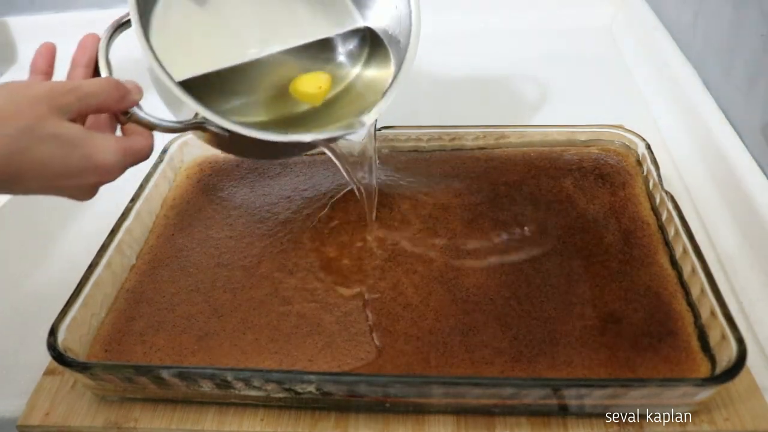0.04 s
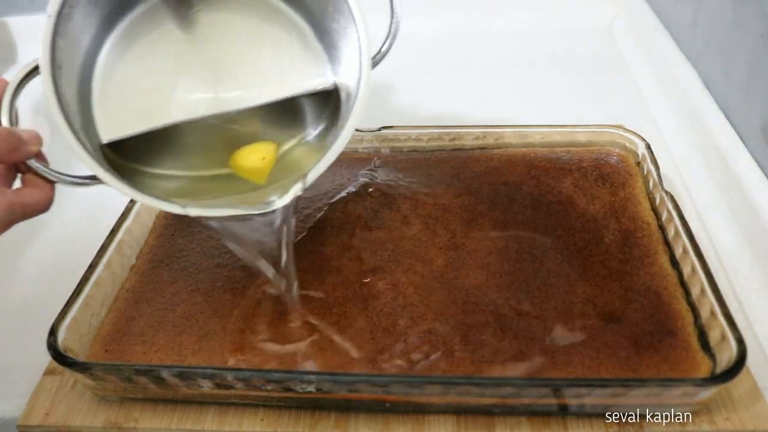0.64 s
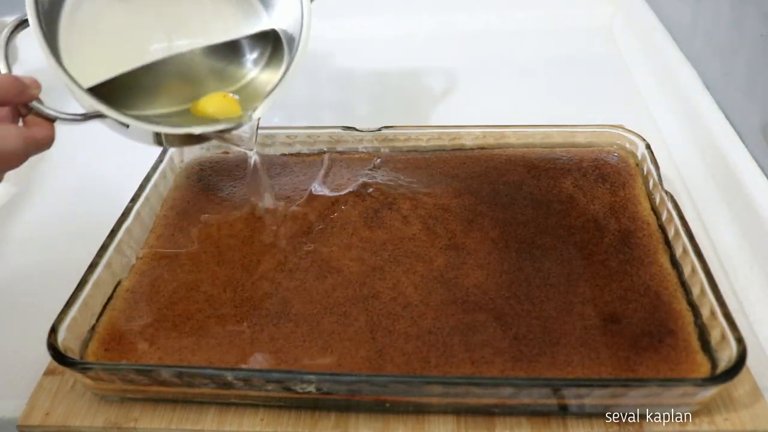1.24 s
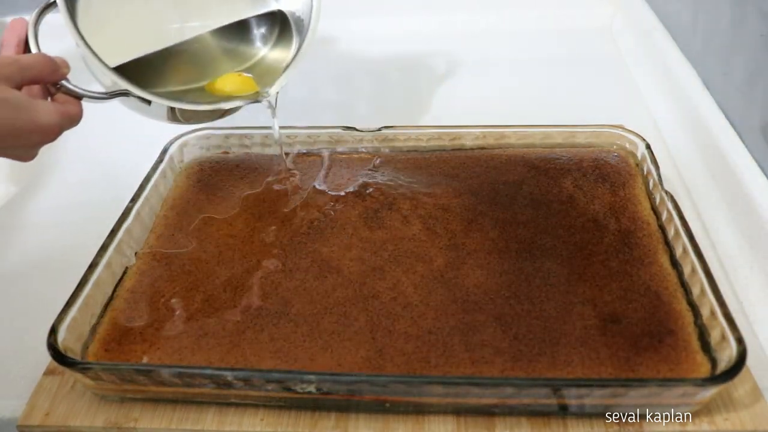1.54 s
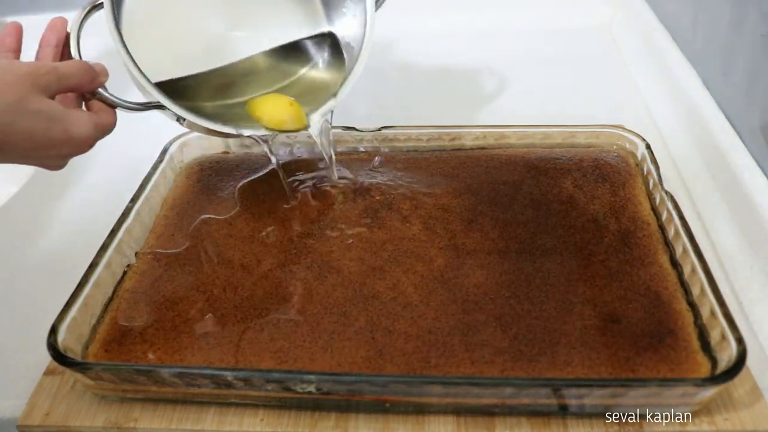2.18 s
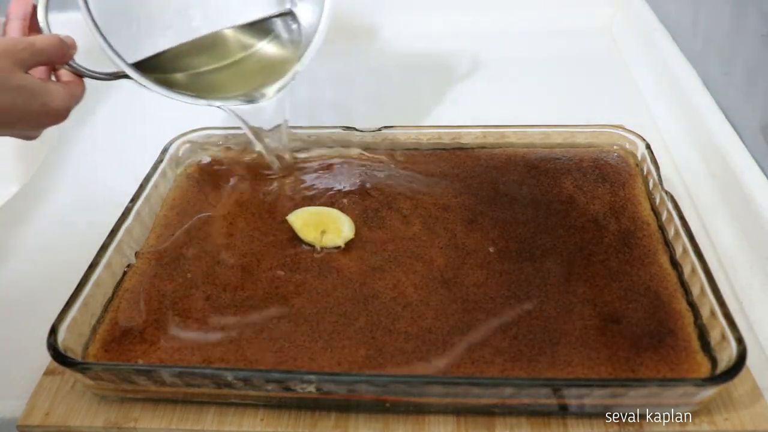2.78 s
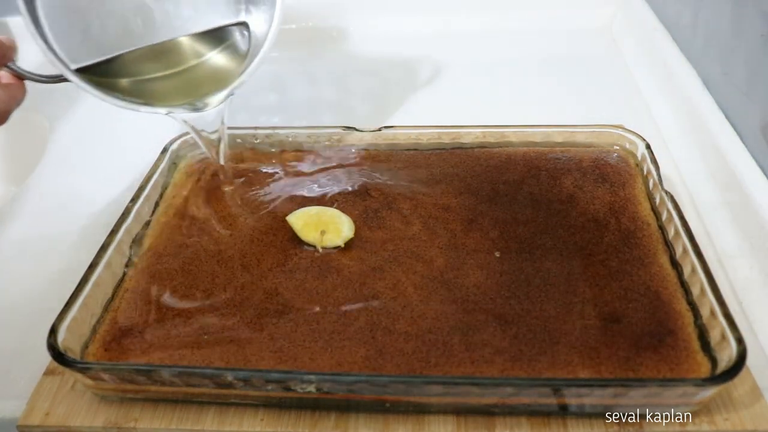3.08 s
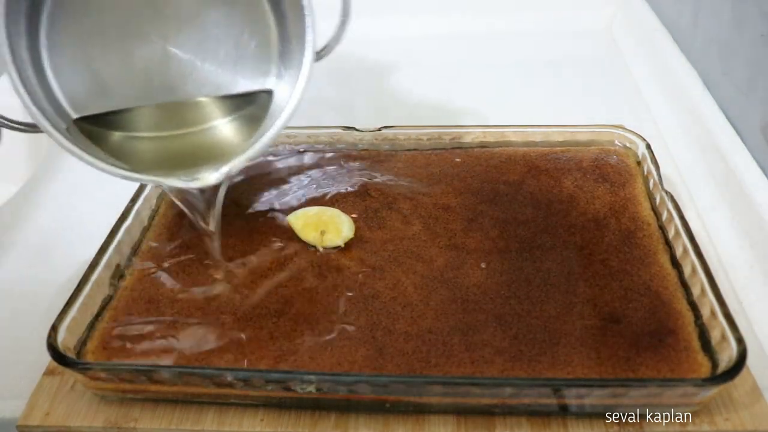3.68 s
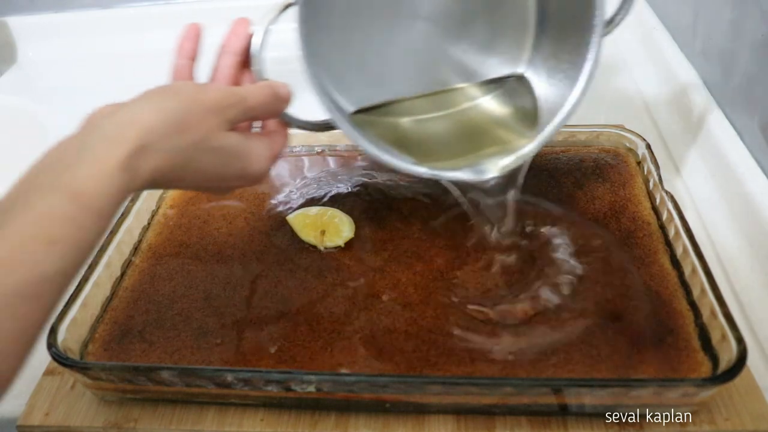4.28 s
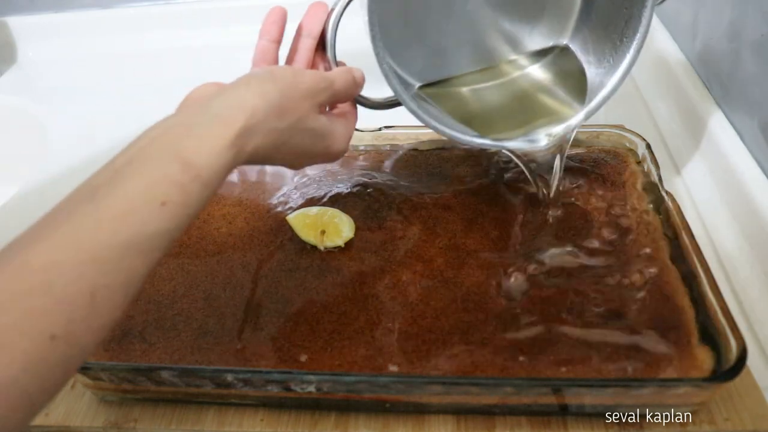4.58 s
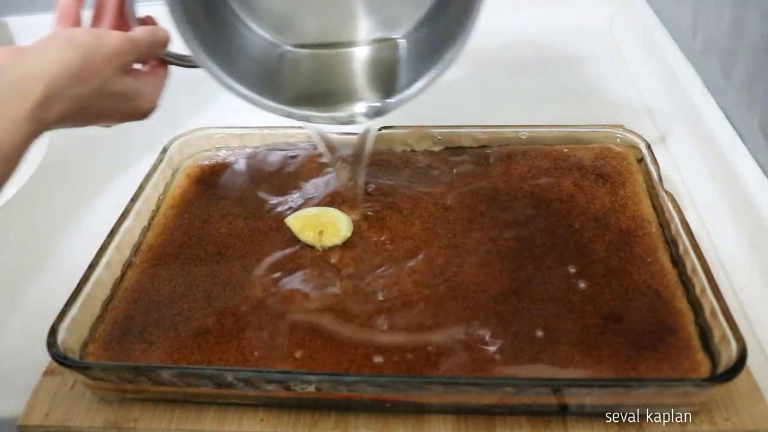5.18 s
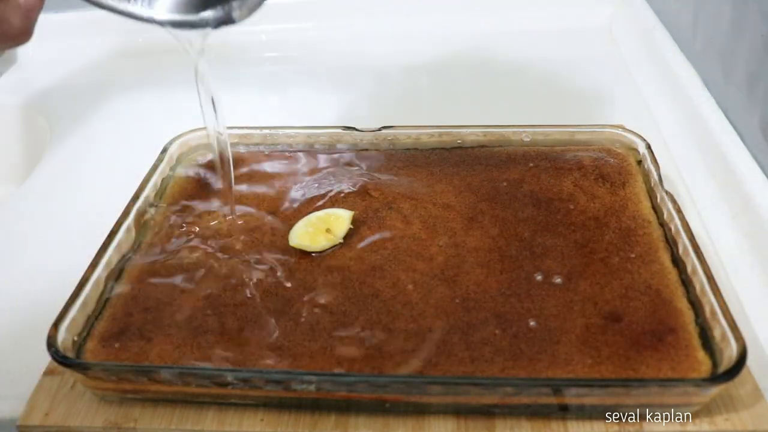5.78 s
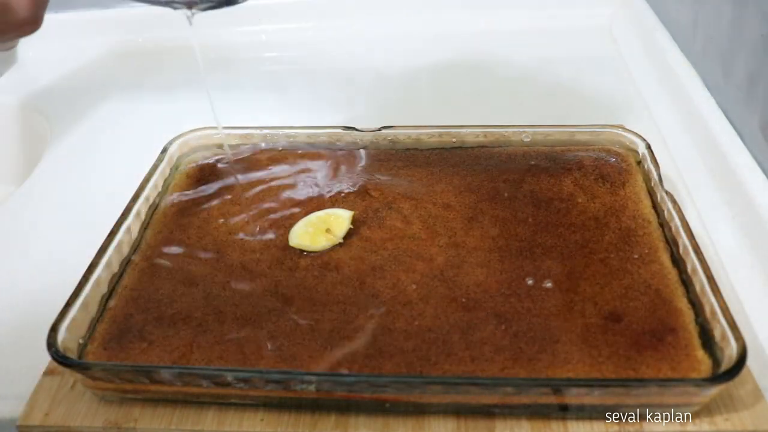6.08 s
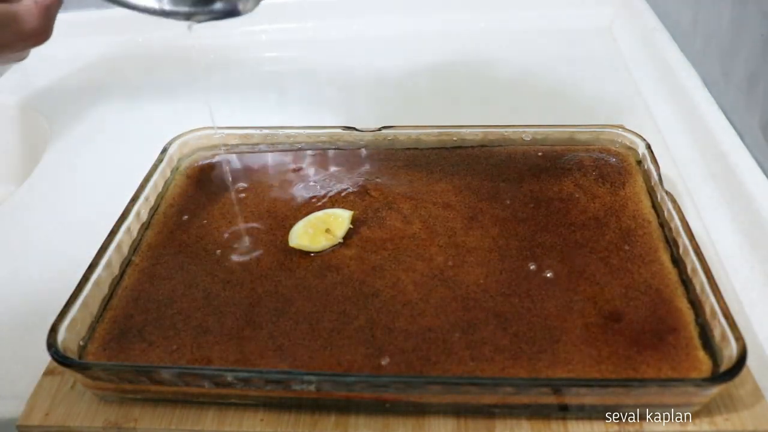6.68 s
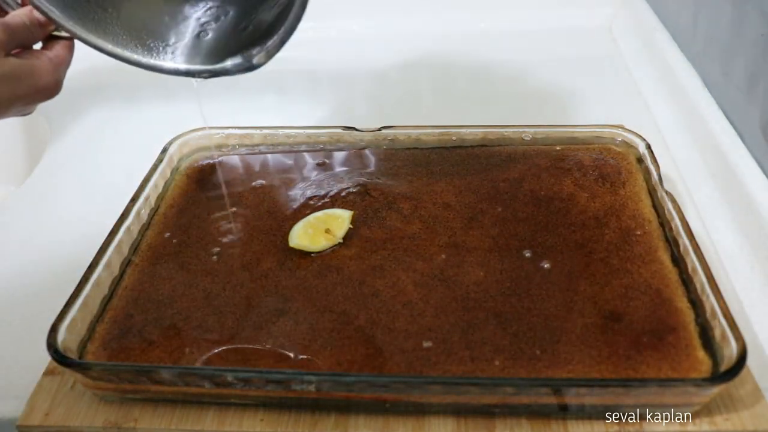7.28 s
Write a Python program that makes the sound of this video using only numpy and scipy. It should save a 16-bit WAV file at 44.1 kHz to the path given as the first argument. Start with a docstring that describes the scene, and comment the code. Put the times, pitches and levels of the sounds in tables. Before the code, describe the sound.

Faint bubbles and spatter from poured syrup, one ringing pot knock and a sharp little slap, over a steady motor hum and fan.

```python
"""Syrup poured from a steel pot over a cake in a glass dish, close to one microphone in a small kitchen.
The thick stream itself is almost silent: one hears air pockets popping, low gulps and fine spatter.
The pot knocks once, a piece of lemon plops out, and at the end the thin stream breaks into ticking drips.
Hard walls nearby answer the pops; behind it all a motor hums and a fan moves air."""
import sys
import numpy as np
from scipy import signal
from scipy.fft import rfft, irfft, next_fast_len
from scipy.io import wavfile

SR = 44100
rng = np.random.default_rng(int(sys.argv[2]) if len(sys.argv) > 2 else 0)


def unload_wav(signal):
    """Save mono or channel-first audio to the path in sys.argv[1] as 16-bit WAV at rate SR, clipped to [-1, 1]."""
    wavfile.write(
        sys.argv[1],
        SR,
        np.round(np.clip(np.atleast_2d(signal).T, -1, 1) * 32767).astype(np.int16),
    )


N = 332459
HZ = np.fft.rfftfreq(2 * next_fast_len(N // 2 + 1, True), 1 / SR)
CLIMB_HZ = 170  # a pop ends about this far above its listed pitch
TICK_HZ, TICK_WIDTH_HZ = 5800, 9000  # the broad tick of a tearing film

# Air pockets opening in the syrup, close to the microphone.
# Each row: start in seconds, level in dB, pitch in Hz, width as a share of the pitch.
AIR_POCKETS = [(0.835, -39, 3020, .28), (0.8955, -30, 1860, .45), (0.899, -35, 1455, .09),
               (0.914, -37.5, 1610, .08), (1.031, -46, 3700, .14), (1.265, -45, 9310, .07),
               (2.561, -31, 7700, .09), (2.5997, -34, 2330, .2), (2.616, -36.5, 1200, .26),
               (2.655, -36, 6660, .12), (2.691, -39, 4000, .22), (2.762, -40, 2450, .2),
               (2.765, -37.5, 1100, .22), (2.789, -38, 2130, .21), (2.815, -34, 2650, .1),
               (2.8164, -26.5, 5920, .1), (2.988, -42, 1980, .09), (3.139, -44.5, 2450, .12),
               (3.187, -41, 4100, .09), (4.4073, -32.5, 3820, .13), (4.414, -36.5, 1315, .11),
               (4.424, -36, 1428, .08), (4.475, -41.5, 967, .09), (4.4946, -33.5, 2320, .14),
               (4.5386, -30, 3280, .13), (4.5772, -35, 3400, .1), (4.728, -36.5, 1240, .075),
               (5.0187, -23.5, 2590, .22), (5.2956, -40, 2990, .11), (5.426, -46, 5210, .1),
               (5.7458, -30.5, 3180, .085), (5.852, -42, 1560, .23), (6.8905, -31, 2810, .16),
               (6.9542, -38, 2680, .14), (7.465, -40, 2880, .25)]
# Large, low pockets tick more softly. Each row: pocket pitch in Hz, lift of the tick in dB.
FILM_TICK = [(1450, -7), (1900, 7)]
def bubbles(ring_db=.7, tick_db=1):
    """Each film tears with a tick and its air pocket rings, climbing in pitch as it opens."""
    out = np.zeros(N)
    for start, db, hz, damping in AIR_POCKETS:
        add(out, start, amp(db + ring_db) * ping(hz, damping * hz, CLIMB_HZ / hz))
        tick = amp(db + read(FILM_TICK, hz) + tick_db) * ping(TICK_HZ, TICK_WIDTH_HZ)
        add(out, start, dish(tick))
    return out


# Drops and bursting films in the dish. Each row: start in seconds, level in dB, pitch in Hz, width in Hz.
SNAPS = [(0.891, -31.5, 4930, 2430), (1.8832, -35, 4500, 4000), (2.5483, -27, 8340, 4000),
         (2.727, -32.5, 3930, 2850), (2.8057, -23.5, 6600, 2490), (2.836, -30, 11500, 4500),
         (2.9127, -34.5, 9800, 5000), (3.852, -33, 7750, 5000), (4.3445, -33, 7000, 3000),
         (4.3633, -33, 3400, 2600), (4.5296, -19.5, 5480, 5700), (4.5778, -11.5, 6850, 3300),
         (4.6626, -26, 6560, 1500), (4.7955, -30, 6400, 1970), (5.0011, -38, 7400, 2000),
         (5.0187, -21, 4200, 4500), (5.0751, -30, 2800, 3750), (5.129, -34, 5800, 1800),
         (5.1377, -25.5, 9700, 3470), (5.2012, -29, 7700, 1800), (5.2956, -29, 8500, 9000),
         (6.3643, -21, 14660, 6910), (6.3725, -20, 10900, 2990), (6.3804, -21, 13870, 6730),
         (6.405, -23, 8940, 2850), (6.412, -15.5, 11500, 3640), (6.4551, -24, 4200, 3500),
         (6.4955, -28, 7840, 1800), (6.5597, -28, 11300, 3810), (6.6033, -24, 4700, 2800),
         (6.6252, -26, 14000, 3490), (6.7039, -24.5, 4500, 5630), (6.722, -27, 12900, 2500),
         (6.7375, -14.5, 12600, 3400), (6.7971, -25.5, 8900, 6610), (6.8336, -25.5, 4470, 1800),
         (6.8606, -26, 5500, 5810), (6.902, -13.5, 9250, 12000), (7.0327, -19, 9700, 7850),
         (7.1956, -28, 3900, 4440), (7.2594, -32, 5350, 1300), (7.2761, -22, 8400, 4840),
         (7.495, -31, 12000, 6000)]
def snaps(level_db=1.2, tick_db=-35):
    """Drops and films snap too briefly to ring, each with the same faint tick."""
    out = np.zeros(N)
    for start, db, hz, width in SNAPS:
        add(out, start, dish(amp(db + level_db) * ping(hz, width, CLIMB_HZ / hz)))
        add(out, start, dish(amp(tick_db) * ping(TICK_HZ, TICK_WIDTH_HZ)))
    return out


# Flurries at the pool, where the stream folds air in or breaks up.
# Each row: start in seconds, hold in seconds, level in dB, typical pitch in Hz.
FLURRIES = [(0.89, .04, -48, 5000), (2.54, .05, -40, 3800), (2.59, .14, -49.5, 5500),
            (2.745, .08, -43, 3400), (2.96, .06, -53, 5000), (4.34, .18, -52, 5000), (4.55, .09, -54, 2800),
            (5.02, .06, -51, 7000), (6.37, .16, -44, 10000), (6.40, .13, -43.5, 3500),
            (6.55, .12, -49, 7000), (6.70, .17, -53.5, 5500), (6.93, .035, -46, 2900),
            (7.09, .11, -51, 7000), (7.28, .04, -49, 8500), (7.495, .05, -46, 3600)]
def spatter(per_s=480, spread_db=2.8, octaves=1.4, damping=.25, tilt_db=1.5, top_hz=15000,
            attack_s=.008, release_s=.025):
    """Countless tiny bubbles burst; each flurry swells quickly, holds and dies away."""
    out = np.zeros(N)
    smooth_stream = (0, N / SR, -68, 5000)  # one faint flurry that lasts throughout
    for start, hold, level_db, typical_hz in [smooth_stream, *FLURRIES]:
        length = hold + np.pi * release_s
        for when, size, force in rng.random((int(per_s * length), 3)):
            age = when * length
            octave = octaves * (2 * size - 1)
            swell = min(age / attack_s, 1) * np.exp(-max(age - hold, 0) / release_s)
            strength = min(-np.log(1 - force), np.pi) - 1  # many weak, a few strong
            db = level_db + spread_db * strength + tilt_db * octave
            hz = min(typical_hz * 2 ** octave, top_hz)
            add(out, start + age, swell * amp(db) * ping(hz, damping * hz))
    return out


def lemon(start=2.5256, level_db=-2):
    """The piece of lemon lands flat on the syrup with one sharp slap."""
    out = np.zeros(N)
    add(out, start, dish(amp(level_db) * ping(hz=9100, width_hz=14000)))
    return out


# The pot's blow, close by: hard contact, the dull give of what it meets, small rebounds.
# Each row: start in seconds, level in dB, pitch in Hz, width in Hz.
POT_BLOW = [(1.9801, -6, 2280, 1460), (1.9800, -19, 6500, 3500), (1.982, -10, 1230, 450),
            (1.9812, -6.5, 515, 315), (1.981, -30.5, 5460, 100), (1.9882, -14.5, 596, 230),
            (1.9850, -30, 111, 45), (2.0225, -19, 525, 270), (2.0240, -28.5, 175, 49),
            (2.0420, -28.5, 80, 23), (2.0700, -22.5, 524, 130)]
# Ringing of pot and dish. Each row: pitch in Hz, level in dB, seconds to fall 60 dB.
POT_MODES = [(377, -10, 0.55), (464, -6.5, 0.49), (532, -4, 0.4), (571, -2, 0.33), (616, 2, 0.36),
             (654, -7, 0.36), (681, -4, .18), (797, -11, 0.32), (964, -7, .15), (1023, -21, 0.97),
             (1122, -8.5, 0.37), (1405, -12, 0.55), (1470, -10, 0.9), (1856, -8, 0.29), (2013, -22, 0.18),
             (2586, -12, 0.29), (2640, -16, 0.34), (2810, -5, 0.1), (3820, -26, 0.46), (3941, -18.5, 0.4),
             (4020, -25, .3), (4140, -24, 0.3), (5426, -25, 0.4), (5510, -29, 0.27), (6800, -31, .2)]
# Dense ringing of the worktop. Each row: frequency in Hz, relative level in dB.
WORKTOP_COLOUR = [(59, -45), (100, -6), (198, -19), (305, -4.5), (332, -18), (416, -22), (592, -10),
                  (791, -1), (877, -16), (1440, -5), (1600, -23), (1810, -7), (2130, -19.5), (3890, -25.5),
                  (14000, -40.5)]
# How the worktop dies away. Each row: frequency in Hz, seconds to fall 60 dB.
WORKTOP_T60 = [(100, 0.85), (500, 0.35), (1500, .38), (4000, 0.36), (12000, 0.087)]
def knock(start=1.981, modes_db=-22.5, clatter_db=8, spread_s=.004):
    """One blow of the pot: a dull thud, ringing steel and glass, and a dense dying clatter."""
    out, t = np.zeros(N), np.arange(SR) / SR
    for contact, db, hz, width in POT_BLOW:
        add(out, contact, amp(db) * ping(hz, width))
    ring = np.zeros(SR)
    for hz, db, t60 in POT_MODES:
        ring += amp(modes_db + db - 60 * t / t60) * np.sin(2 * np.pi * (hz * t + rng.random()))
    add(ring, 0, amp(clatter_db) * tail(WORKTOP_T60, WORKTOP_COLOUR))
    spread = 1 - np.exp(-t / spread_s)  # the ringing spreads from the point of contact
    add(out, start, ring * spread)
    return out


def dish(sound, echo=.84, span_s=.0019, count=14):
    """The dish walls and the pot throw a pop back within a moment, differently from each spot."""
    delays = (np.sort(rng.random(count)) * span_s * SR).astype(int)
    sizes = rng.standard_normal(count) * np.geomspace(1, .5, count)
    taps = np.zeros(int(span_s * SR) + 2)
    taps[0] = 1  # the direct path to the microphone
    np.add.at(taps, 1 + delays, echo * sizes / np.linalg.norm(sizes))
    return np.convolve(sound, taps / np.linalg.norm(taps))


# The small kitchen around the microphone. Each row: frequency in Hz, seconds to fall 60 dB.
KITCHEN_T60 = [(200, 0.53), (1500, 0.18), (3500, 0.26), (7000, 0.2), (14000, 0.18)]
def kitchen(pops, wet_db=.5, gap_s=.0012, count=3):
    """Hard walls close by answer each pop with a short bright tail whose colour keeps shifting."""
    out, t = pops.copy(), np.arange(N) / SR
    for k in range(count):
        walls = tail(KITCHEN_T60)
        walls *= 1 - np.exp(-(t[:len(walls)] / gap_s) ** 2)
        share = np.sqrt(2 / count) * np.cos(np.pi * (2 * t + k / count))  # the squares sum to 1
        out += amp(wet_db) * signal.fftconvolve(pops * share, walls)[:N]
    return out


# Motor and mains hum behind the pour. Each row: pitch in Hz, rms level in dB, unsteadiness from 0 to 1.
HUM_LINES = [(81.4, -55.5, 0.38), (99.5, -59.5, 0.44), (162.4, -55, 0.53), (199.1, -57, 0.65),
             (246.6, -69, 0.55), (301.5, -55.5, 0.57), (343.2, -47, 0.05), (408.6, -63.5, 0.3),
             (692, -71.5, 0.36), (923, -79.5, 0.5), (968.5, -65, 0)]
def motor(waver_hz=5, flutter_hz=1.2, wander_rad=.27):
    """The motor hums in lines that waver in level and phase."""
    out, t = np.zeros(N), np.arange(N) / SR
    wander = wander_rad * drift(flutter_hz)
    sway = drift(waver_hz) + 1j * drift(waver_hz)
    for hz, db, unsteady in HUM_LINES:
        body = np.sqrt(2 * (1 - unsteady ** 2)) + unsteady * np.roll(sway, rng.integers(N))
        phase = 2 * np.pi * (hz * t + rng.random()) + wander
        out += amp(db) * (body * np.exp(1j * phase)).real
    return out


# The fan's rumble in the background. Each row: frequency in Hz, relative level in dB.
FAN_RUMBLE = [(15, -16), (31, 0), (58, -15.5), (85, -1.5), (130, -4), (180, -1.5), (230, -2), (290, -7),
              (380, 0), (440, -12.5), (600, -20), (1200, -76)]
# Its hiss. Each row: frequency in Hz, relative level in dB.
FAN_HISS = [(260, -42), (450, -7), (485, 1), (782, -7), (936, -1), (1020, -8), (1470, -11.5), (4560, -19.5),
            (5790, -18), (16000, -24.5)]
# Its resonances. Each row: pitch in Hz, width in Hz, lift in dB.
FAN_WHISTLES = [(940, 95, 1), (1482, 43, 6.5), (2185, 8.3, 15), (3510, 16, 12.5), (4170, 17, 14.5),
                (5930, 320, 7.5), (7250, 39, 5)]
def fan(rumble_db=-49.5, hiss_db=-55):
    """Moving air: a low rumble and a soft hiss with a few faint whistles."""
    whistles = sum(db / (1 + (2 * (HZ - hz) / width) ** 2) for hz, width, db in FAN_WHISTLES)
    rumble = amp(rumble_db) * noise(read(FAN_RUMBLE, HZ))
    hiss = amp(hiss_db) * noise(read(FAN_HISS, HZ) + whistles)
    return rumble + hiss


def ping(hz, width_hz, rise=0.):
    """A damped resonance that swells softly to 1 and dies; its pitch may climb as it goes."""
    rate = 1.5 * np.pi * width_hz
    age = rate * np.arange(int(4 * np.pi * SR / rate) + 2) / SR  # in decay times
    pitch = hz * (1 + rise * np.tanh(age / np.pi - .5))
    envelope = (age / 2) ** 2 * np.exp(2 - age)
    return envelope * np.sin(2 * np.pi * np.cumsum(pitch) / SR)


def tail(t60, colour=None):
    """A dense random decay of energy 1; each band dies at its own speed."""
    hz, t, bands = signal.stft(rng.standard_normal(SR), SR, nperseg=256)
    decay = amp(-60 * t / read(t60, hz)[:, None])
    x = signal.istft(bands * decay, SR, nperseg=256)[1][:SR]
    if colour:
        gain = amp(read(colour, np.fft.rfftfreq(SR, 1 / SR)))
        x = irfft(rfft(x) * gain, SR)[:SR * 3 // 4]
    return x / np.linalg.norm(x)


def noise(db):
    """Steady noise of rms 1 with the given relative level at each frequency."""
    bins = rng.standard_normal(len(HZ)) + 1j * rng.standard_normal(len(HZ))
    x = irfft(bins * amp(db))[:N]
    return x / np.sqrt(np.mean(x ** 2) + 1e-20)


def drift(hz):
    """Slow random motion up to about hz, rms 1."""
    return noise(-10 * np.log10(1 + (HZ / hz) ** 6))


def amp(db):
    """Decibels to gain."""
    return 10 ** (np.asarray(db) / 20)


def read(points, hz):
    """Reads a table on a log-frequency axis."""
    point_hz, value = np.transpose(points)
    return np.interp(np.log(hz + 1), np.log(point_hz + 1), value)


def add(mix, start, sound):
    """Mixes a sound in at start seconds."""
    part = mix[max(round(start * SR), 0):][:len(sound)]
    part += sound[:len(part)]


def scene():
    """The pour and the knock over the kitchen's hum, in mono from beside the dish."""
    return (motor() + fan() + knock() + kitchen(bubbles() + snaps() + lemon() + spatter()))[None]


def record(dry):
    """The recorder cuts the treble above about 16 kHz."""
    lowpass = signal.firwin(255, cutoff=15950, window=("kaiser", 9), fs=SR)
    return signal.oaconvolve(dry, lowpass[None], "same")


dry = scene()
out = record(dry)
unload_wav(out)
```